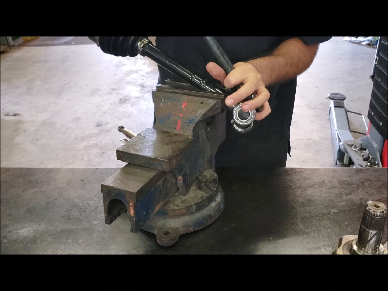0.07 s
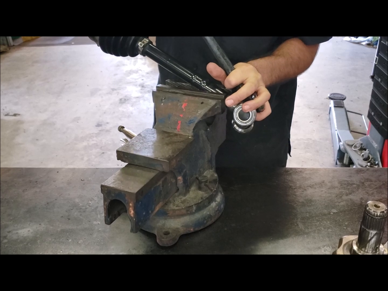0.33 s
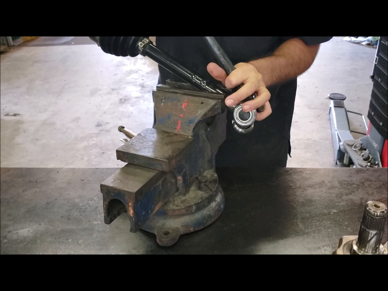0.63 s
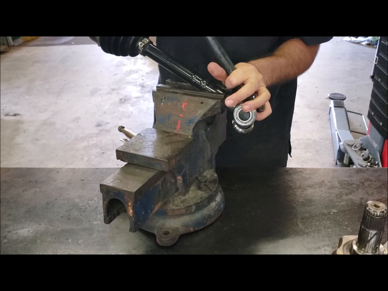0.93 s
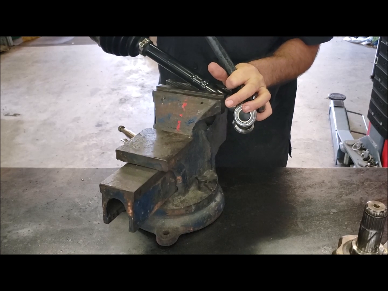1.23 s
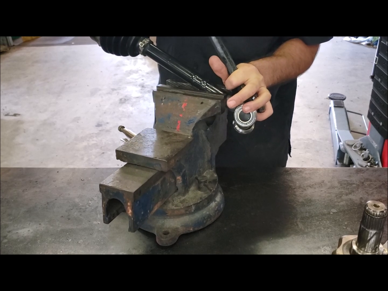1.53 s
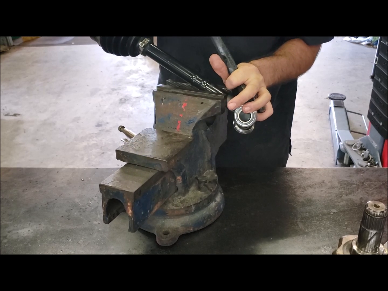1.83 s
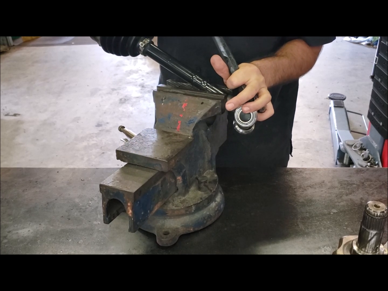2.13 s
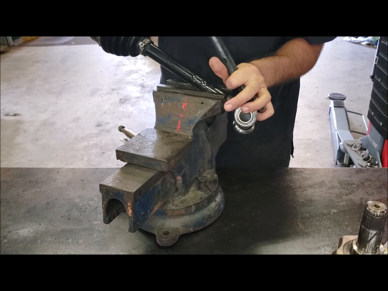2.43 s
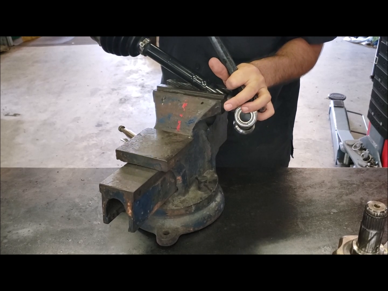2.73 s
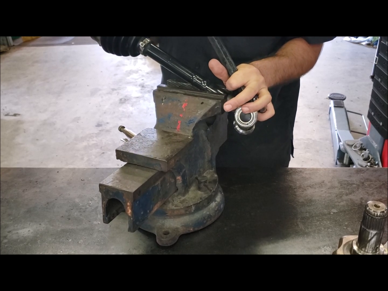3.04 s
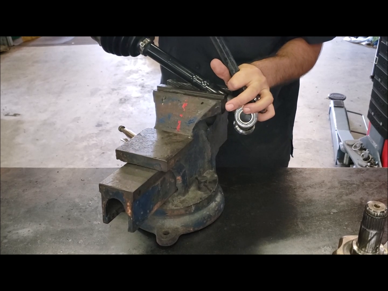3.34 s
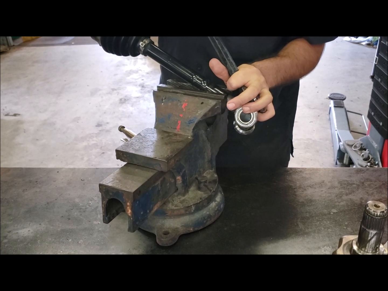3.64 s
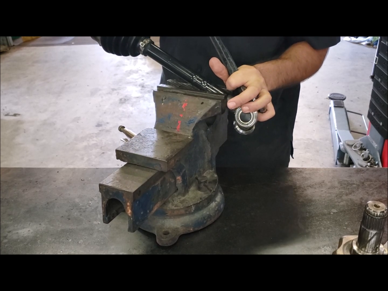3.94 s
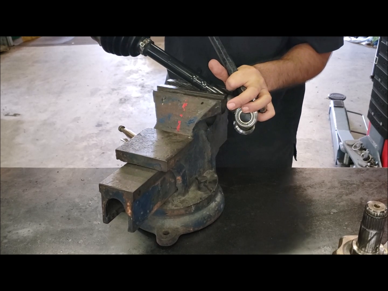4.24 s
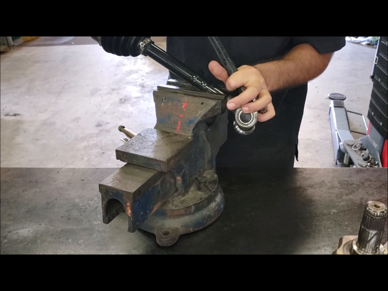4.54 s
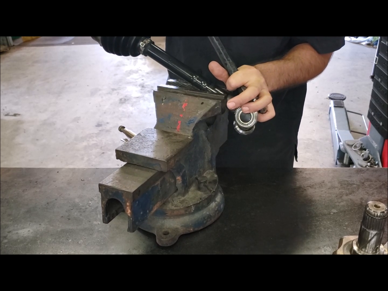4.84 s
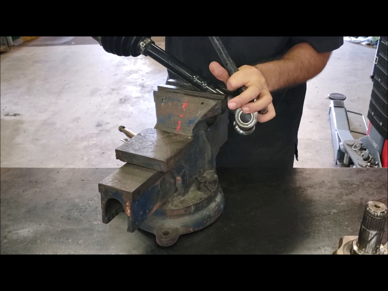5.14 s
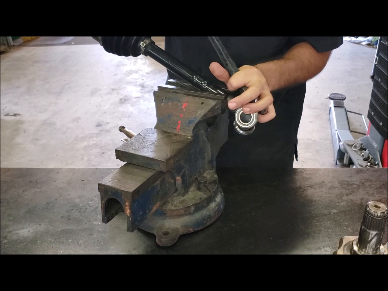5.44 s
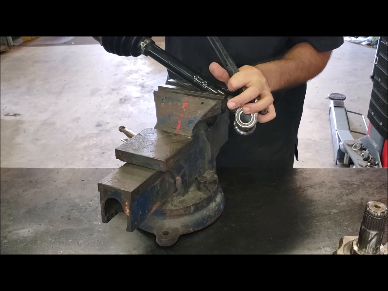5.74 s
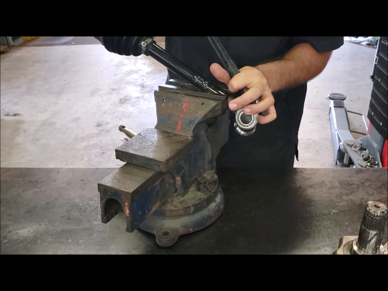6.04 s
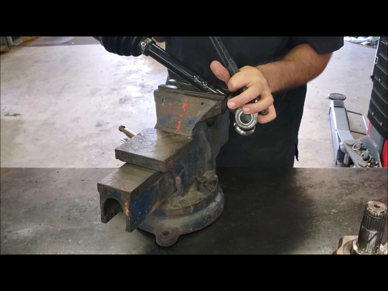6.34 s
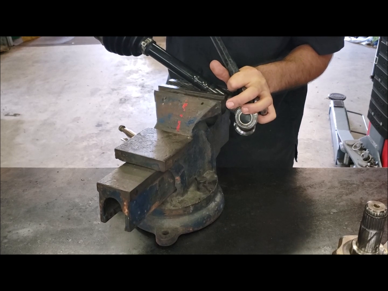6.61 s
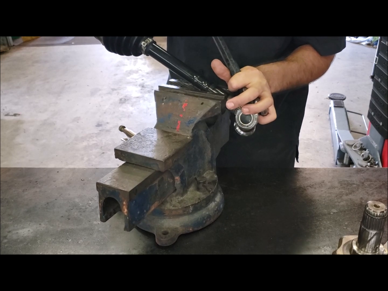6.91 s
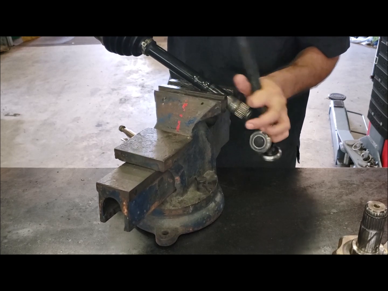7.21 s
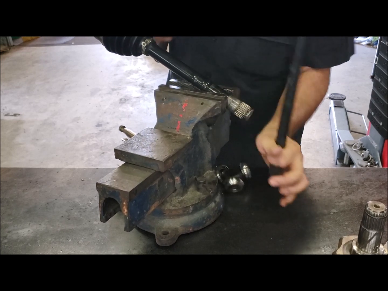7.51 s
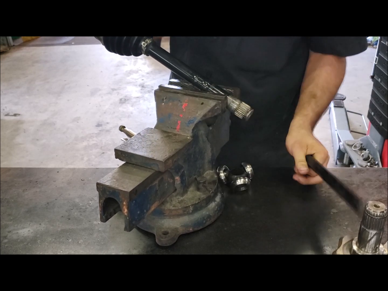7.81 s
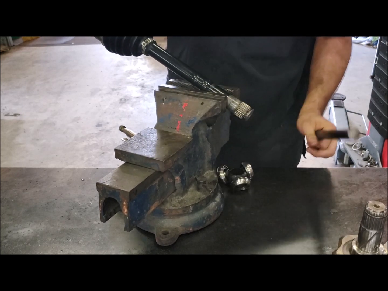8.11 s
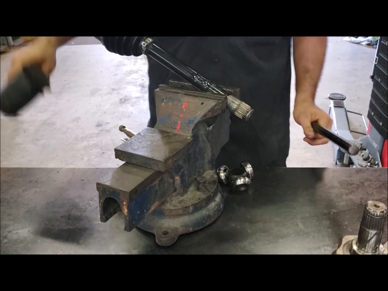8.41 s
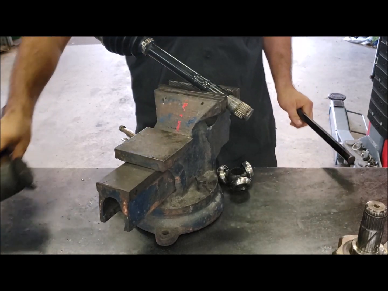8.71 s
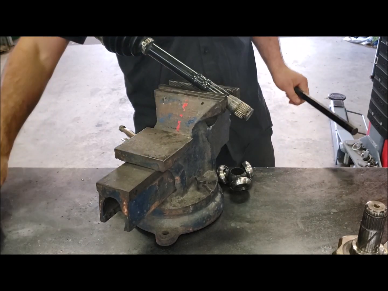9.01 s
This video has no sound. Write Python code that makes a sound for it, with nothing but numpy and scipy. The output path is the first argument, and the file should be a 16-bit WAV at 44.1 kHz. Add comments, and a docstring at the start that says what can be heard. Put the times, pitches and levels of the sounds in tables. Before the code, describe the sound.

In a workshop, a hammer taps a steel chisel against a joint on a shaft held in a vise, about three sharp, ringing clacks a second. The tapping pauses twice for faint knocks as the chisel is reseated. After a longer run, the joint slips off and rattles to rest on the steel bench, and the hammer lands with a clatter and thud. The sound is close, with short room echoes over a faint hush.

```python
"""In a workshop, a hammer taps a steel chisel set against a joint on a shaft clamped in a bench vise.
Each tap clacks through the vise, rings chisel and shaft and shakes the steel bench; twice the chisel
is nudged into a new seat. The joint slips off, drops and rattles to rest on the bench top; then the
hammer is put down. Clacks are noise bursts, most through steel resonances; rings are decaying modes.
Short room echoes and a faint hush, rumble and hiss lie underneath."""
import sys
import numpy as np
from scipy import signal
from scipy.fft import rfft, irfft, next_fast_len
from scipy.io import wavfile

SR = 44100
rng = np.random.default_rng(int(sys.argv[2]) if len(sys.argv) > 2 else 0)


def wav_record(signal):
    """Record a signal, one row per channel, as 16-bit PCM in the file named by sys.argv[1]."""
    frames = np.transpose(np.atleast_2d(signal))
    bounded = np.clip(frames, -1, 1)
    # unit amplitude maps onto the largest positive 16-bit level
    quanta = np.round(bounded * 32767).astype(np.int16)
    wavfile.write(sys.argv[1], SR, quanta)


N = 399546
RING_SAMPLES = 65536
TIME_S, AGE_S = np.arange(N) / SR, np.arange(RING_SAMPLES) / SR
GIVE_S = 7.05  # the joint starts to give way

# Blows on the chisel. Each row: start in seconds, level in dB, rattle in dB (chatter of the parts),
# ping in dB (how freely the chisel rings), knock in dB (how squarely the blow enters the vise).
CHISEL_TAPS = [ (0.0123, -21.5, 3, -7.5, 0), (0.2901, -19.5, 1.5, -3, 0), (.583, -16, -1.5, -2, -1),
               (0.8681, -15, -4, 3.5, -4.5), (1.1421, -18.5, 2, 10, -2), (1.424, -16, -3, 2, -1.5),
               (2.549, -18.5, -2.5, -5.5, -3), (2.869, -18, -2.5, -1, -1), (3.179, -18, -2, 15.5, 3),
               (4.5065, -20.5, -2.5, -4, 3.5), (4.8447, -17.5, 0, 7.5, 1.5), (5.1732, -17, -5, -19.5, 0),
               (5.463, -18.5, 1.5, 5, -1.5), (5.764, -15, -0.5, 9.5, -2), (6.0993, -18, 1, 9.5, 0.5),
               (6.464, -16, 1, 5.5, -1.5), (6.836, -17, -1.5, -8.5, -0.5), (7.175, -18.5, -1, 11, 1)]
# Resonances of chisel, shaft and vise. Each row: frequency in Hz, width in Hz, lift in dB.
VISE_RESONANCES = [(405, 45, 13), (470, 45, 11), (728, 50, 13), (805, 35, 10), (947, 35, 6),
                   (1073, 45, 17.5), (1270, 40, 6), (1660, 50, 6), (1840, 45, 10), (2030, 50, 6),
                   (2340, 55, 6), (2700, 65, 5), (3000, 70, 6), (3300, 120, 6), (5110, 70, 11),
                   (5950, 180, 7), (7800, 100, 9), (8170, 90, 7), (10980, 110, 11), (11800, 70, 6),
                   (14610, 80, 10)]
# Bench frame. Each row: frequency in Hz, level in dB, t60 in seconds.
FRAME_MODES = [(65.7, -1, 0.57), (72.6, -4.5, 0.91), (91, -8.5, 0.73), (106.3, 0, 0.46),
               (138.5, -13.5, 1.3), (170.7, -5, 0.74), (199.4, -2.5, 0.83), (215.7, -7.5, 0.95),
               (243, -7.5, 0.75)]
# Bench top plate. Each row: frequency in Hz, level in dB, t60 in seconds.
PLATE_MODES = [(248, -33, 1.5), (295, -14, .05), (350, -9, .05), (405, 1, .1), (440, 0, .08), (474, 0, .08),
               (530, -8, .06)]
# Clatter of a landing on the bench. Each row: frequency in Hz, spectral density in dB.
CLATTER_SPECTRUM = [(100, -35), (300, -9.5), (700, -3.5), (1400, 2.5), (2500, 3), (4500, 2), (6500, -2),
                    (8500, -11), (11500, -9.5), (16000, -20.5)]
# Stereo likeness. Each row: frequency in Hz, left-right correlation.
STEREO_LIKENESS = [(60, 0.99), (290, 0.9), (640, 0.84), (1400, 0), (3000, 0.015), (16000, 0)]


def from_db(db):
    """Decibels to gain."""
    return 10 ** (np.asarray(db) / 20)


def rms_one(x):
    """Scale to rms 1."""
    return x / np.sqrt(np.mean(x ** 2) + 1e-20)


def at_hz(points, hz):
    """Read a table on a log-frequency axis."""
    return np.interp(np.log(hz), np.log(np.array(points)[:, 0]), np.array(points)[:, 1])


def bins_hz(size):
    """FFT bin frequencies, floored at 1 Hz."""
    return np.maximum(np.fft.rfftfreq(size, 1 / SR), 1)


def tint(x, gain_db):
    """Apply a gain per frequency bin."""
    return irfft(rfft(x) * from_db(gain_db), x.shape[-1])


def stereo_noise(size):
    """White noise, alike on both sides in the bass only."""
    alike = np.clip(at_hz(STEREO_LIKENESS, bins_hz(size)), -.99, .99)
    mid, side = rfft(rng.standard_normal((2, size)))
    return irfft(np.sqrt(1 + alike) * mid + np.sqrt(1 - alike) * side * [[1], [-1]], size)


def add(track, start_s, sound):
    """Mix a sound in from start_s."""
    start = int(np.clip(start_s * SR, 0, N - 1))
    track[:, start:start + sound.shape[1]] += sound[:, :N - start]


def swell(centre_s, half_s):
    """Gaussian rise and fall of height 1."""
    return np.exp(-((TIME_S - centre_s) / half_s) ** 2)


def ring(modes, rise_s):
    """Decaying modes of one blow, each struck with random strength; starts near rms 1."""
    out = np.zeros((2, RING_SAMPLES))
    for hz, db, t60_s in modes:
        spread_rad = np.arccos(np.clip(at_hz(STEREO_LIKENESS, hz), -1, 1))
        phase = rng.uniform(0, 2 * np.pi) + spread_rad * rng.normal(0, 0.29, (2, 1))
        decay = from_db(db + 2 * rng.normal() - 60 * AGE_S / t60_s)
        out += decay * np.sin(2 * np.pi * hz * AGE_S + phase)
    power = sum(from_db(row[1]) ** 2 for row in modes) / 2
    return out * (1 - np.exp(-AGE_S / rise_s)) / np.sqrt(power)


def shimmer(modes, t60_s, size):
    """Steel touching steel: each mode splits into a cluster that beats as it dies; starts near rms 1."""
    hz = bins_hz(size)
    clusters = sum(from_db(db + 3 * rng.normal()) / (1 + (2 * (hz - centre_hz) / width_hz) ** 2)
                   for centre_hz, width_hz, db in modes)
    partials = clusters * np.exp(2j * np.pi * rng.random((2, len(hz))))
    return rms_one(irfft(partials, size)) * from_db(-60 * AGE_S[:size] / t60_s)


def chatter(rise_s, t60_s, size):
    """Contact chatter: a noise burst that drives all frequencies, some a little harder than others."""
    age_s = AGE_S[:size]
    envelope = (1 - np.exp(-(age_s / rise_s) ** 2)) * from_db(-60 * age_s / t60_s)
    spectrum = rfft(stereo_noise(size) * envelope)
    flattened = irfft(spectrum / np.sqrt(np.abs(spectrum) + 1e-9), size)
    return flattened * np.minimum(1, 4 * envelope)


def clack(spectrum, resonances, colour_db, rise_s, t60_s, window_s, size=8192):
    """Chatter, coloured by the contact, feeds the steel's resonances; rms 1 over the first window_s."""
    hz = bins_hz(size)
    body_db, knock_db, bite_db, treble_db = colour_db
    contact = [(550, body_db), (1100, knock_db), (1800, 0), (3200, bite_db), (7000, treble_db)]
    drive = tint(chatter(rise_s, t60_s, size), at_hz(spectrum, hz) + at_hz(contact, hz))
    drive *= (1 - np.exp(-2 * AGE_S[:size] / rise_s)) * (np.arange(size) < size / 2)
    out = drive.copy()
    for centre_hz, width_hz, lift_db in resonances:
        radius = np.exp(-np.pi * width_hz / SR)
        zeros = np.array([1, 0, -1]) * (1 - radius ** 2) / 2
        poles = [1, -2 * radius * np.cos(2 * np.pi * centre_hz / SR), radius ** 2]
        struck_db = lift_db + 2.5 * rng.normal()  # no two blows land on the same spot
        out += (from_db(struck_db) - 1) * signal.lfilter(zeros, poles, drive)
    return out / np.sqrt(np.mean(out[:, :int(window_s * SR)] ** 2))


def background():
    """Steady shop hush; rumble and hiss that sink after each tap; soft low bumps in the final lull."""
    # Three noise beds. Each row: frequency in Hz, spectral density in dB.
    hush_spectrum = [(25, -12.5), (65, -6), (95, -8.5), (150, -6.5), (260, -6), (500, -16.5), (800, -20.5),
                     (1100, -18), (1600, -39), (3000, -38), (6200, -35), (7200, -7), (8000, -27.5),
                     (9000, -44.5), (16000, -53)]
    rumble_spectrum = [(30, -22), (60, -0.5), (88, 3.5), (125, -10.5), (200, -16.5), (300, -17), (450, -24),
                       (1000, -23.5), (4000, -58)]
    hiss_spectrum = [(1000, -13), (2400, -6), (3700, 5), (4500, -1), (5500, -1.5), (7300, 2), (8600, -13),
                     (12000, -16), (16000, -38.5)]
    size = next_fast_len(N)
    hush, rumble, hiss = (rms_one(tint(stereo_noise(size), at_hz(spectrum, bins_hz(size))))[:, :N]
                          for spectrum in (hush_spectrum, rumble_spectrum, hiss_spectrum))
    starts_s = np.sort([0] + [row[0] for row in CHISEL_TAPS])
    since_tap_s = TIME_S - starts_s[np.searchsorted(starts_s, TIME_S, side="right") - 1]
    rumble_db = -49.5 - 3 * since_tap_s - 21 * np.maximum(TIME_S - GIVE_S, 0)
    hiss_db = -53.5 - 5.5 * since_tap_s - 26 * swell(centre_s=8.62, half_s=0.2)
    bumps = sum(from_db(db) * swell(centre_s, half_s=0.055)
                for centre_s, db in [(7.98, -64), (8.45, -59), (8.85, -62), (8.98, -61.5)])
    return from_db(-63) * hush + (from_db(rumble_db) + bumps) * rumble + from_db(hiss_db) * hiss


def workshop_echoes(sound, build_s):
    """Diffuse echoes build up, then die band by band, the high treble first."""
    # Room decay. Each row: frequency in Hz, t60 in seconds.
    room_decay = [(100, 0.73), (400, 0.62), (1000, 0.59), (2800, 0.75), (6000, 0.61), (10000, 0.54),
                  (16000, 0.2)]
    # Echo colour. Each row: frequency in Hz, level in dB.
    room_colour = [(100, 9.5), (400, 4.5), (1000, -2), (2000, -0.5), (5000, -1), (10000, -0.5),
                   (16000, 4.5)]
    hz = bins_hz(RING_SAMPLES)
    noise_spectrum = rfft(rms_one(stereo_noise(RING_SAMPLES)))
    log_centres = np.log([row[0] for row in room_decay])
    tail = 0
    for share, (_, t60_s) in zip(np.eye(len(room_decay)), room_decay):
        band = np.interp(np.log(hz), log_centres, share) * from_db(at_hz(room_colour, hz))
        tail = tail + irfft(noise_spectrum * band) * from_db(-60 * AGE_S / t60_s)
    build_up = 1 - np.exp(-(AGE_S / build_s) ** 2)
    response = rms_one(tail * build_up) / np.sqrt(RING_SAMPLES)
    return signal.fftconvolve(sound, response, axes=1)[:, :N]


def chisel_nudges():
    """Light contacts knock dully on the vise, clink the loose chisel and stir the bench frame."""
    # Reseating contacts. Each row: start in seconds, knock level in dB, clink in dB over the knock.
    nudges = [(1.729, -37, 5), (1.835, -42, -26), (2.1188, -36, -8), (3.717, -30, -3.5), (3.844, -47, -10),
              (3.9081, -28.5, -26)]
    # Dull knock. Each row: frequency in Hz, spectral density in dB.
    knock_spectrum = [(100, -24.5), (240, 4.5), (310, -21), (400, 1.5), (600, 1.5), (1100, 3), (2000, 9.5),
                      (2800, -10), (6000, -28), (9000, -20), (16000, -39)]
    # Loose chisel. Each row: frequency in Hz, width in Hz, level in dB.
    clink_modes = [(2824, 230, -2.5), (4970, 72, -10), (5460, 380, -8.5), (7800, 160, -3.5),
                   (11350, 150, -12)]
    out = np.zeros((2, N))
    for start_s, db, clink_db in nudges:
        colour_db = (5 - 0.4 * clink_db, 0, 0, 0)  # less clink, more body
        knock = clack(knock_spectrum, VISE_RESONANCES[:6], colour_db,
                      rise_s=0.00063, t60_s=0.053, window_s=0.012)
        add(out, start_s, from_db(db) * knock)
        add(out, start_s, from_db(db + clink_db) * shimmer(clink_modes, t60_s=0.064, size=8192))
        add(out, start_s, from_db(db - 21) * ring(FRAME_MODES, rise_s=0.0097))
    return out


def hammer_down():
    """Handle and head land on the bench in turn, each with a clatter, a plate ring and a thud."""
    # Landings. Each row: start in seconds, clatter in dB, plate ring in dB, thud in dB.
    landings = [(9.036, -16, -19, -21.5), (9.051, -22.5, -20, -20)]
    # Thud under the hammer. Each row: frequency in Hz, level in dB, t60 in seconds.
    thud_modes = [(105.2, -2.5, .4), (153, 0.5, 0.18), (201, 5.5, 0.7), (255, 2, 0.32)]
    out = np.zeros((2, N))
    for start_s, clatter_db, plate_db, thud_db in landings:
        clatter = clack(CLATTER_SPECTRUM, [], colour_db=(8, 3, -2.5, 3.5),
                        rise_s=0.0014, t60_s=0.58, window_s=0.0185)
        add(out, start_s, from_db(clatter_db) * clatter)
        add(out, start_s, from_db(plate_db) * ring(PLATE_MODES, rise_s=0.0012))
        add(out, start_s, from_db(thud_db) * ring(thud_modes, rise_s=0.0024))
    return out


def falling_joint():
    """The joint clinks off the shaft and rattles to rest; flat landings ring and thump the bench top."""
    # Bounces. Each row: start in seconds, level in dB, weight in dB (high if flat, low if glancing).
    bounces = [(7.422, -25, 4.5), (7.457, -21, -5), (7.5108, -10.5, 12), (7.5207, -19, 11.5),
               (7.5313, -11, 9), (7.57, -10.5, -12.5), (7.576, -16, -7), (7.598, -16, -9),
               (7.638, -18, -2.5)]
    # Resonances of the joint. Each row: frequency in Hz, width in Hz, lift in dB.
    joint_resonances = [(735, 56, 7), (960, 30, 10.5), (2100, 32, 1.5), (2224, 40, 0), (2620, 23, 5),
                        (3740, 47, 7.5), (3720, 23, -3.5), (4170, 17, 6.5), (5840, 50, -4.5),
                        (6730, 47, 1.5), (11600, 60, 11)]
    # Lingering ring of the freed steel. Each row: frequency in Hz, width in Hz, level in dB.
    steel_modes = [(2850, 430, -13), (3750, 130, 2), (4140, 110, -7.5), (4770, 8.7, 7.5)]
    # Bench thump. Each row: frequency in Hz, spectral density in dB.
    thump_spectrum = [(60, -25), (120, -13.5), (190, 0), (260, 2), (340, -6.5), (700, -28.5),
                      (2000, -57)]
    out = np.zeros((2, N))
    for start_s, db, weight_db in bounces:
        clatter = clack(CLATTER_SPECTRUM, joint_resonances, colour_db=(weight_db, 0.5, 0, 3),
                        rise_s=0.0004, t60_s=0.077, window_s=0.0036)
        add(out, start_s, from_db(db) * clatter)
        plate_db = db - 17 + weight_db
        add(out, start_s, from_db(plate_db) * ring(PLATE_MODES, rise_s=0.0016))
        thump = clack(thump_spectrum, [], (0, 0, 0, 0), rise_s=0.0059, t60_s=0.16, window_s=0.023)
        add(out, start_s, from_db(plate_db - 15.5) * thump)
        add(out, start_s, from_db(db - 35) * shimmer(steel_modes, t60_s=1.42, size=RING_SAMPLES))
    return out


def steel_blow(db, colour_db, rattle_db):
    """A clack that lengthens with rattle, plus the hard faces' brief crack; returns direct, room send."""
    # Clack of chisel, shaft and vise. Each row: frequency in Hz, spectral density in dB.
    clack_spectrum = [(100, -14.5), (300, -19), (600, -10.5), (900, -3), (1300, -4), (2000, -2), (3100, -3),
                      (4200, -2.5), (6000, -6.5), (8000, -4), (9500, -10), (11500, -4.5), (13500, -10),
                      (16000, -10.5)]
    # Hammer face on chisel head. Each row: frequency in Hz, spectral density in dB.
    crack_spectrum = [(300, -30.5), (1500, 10), (3200, 13), (4200, -12), (5600, 8.5), (8000, 2),
                      (16000, -11.5)]
    chatter_t60_s = 0.065 * np.exp(0.046 * rattle_db)
    hit = clack(clack_spectrum, VISE_RESONANCES, colour_db,
                rise_s=0.0012, t60_s=chatter_t60_s, window_s=0.015)
    crack = clack(crack_spectrum, [], colour_db, rise_s=0.0013, t60_s=0.017, window_s=0.0036)
    return from_db(db) * hit + from_db(db + 3) * crack, from_db(db + rattle_db) * hit


def tap_colour_db(ping_db, knock_db):
    """A square blow trades body and bite for knock; a freely held chisel adds bite and treble."""
    body_db = 5 - 0.51 * knock_db
    bite_db = -4.5 + 0.16 * ping_db - 0.75 * knock_db
    treble_db = -1.5 + 0.26 * ping_db
    return body_db, knock_db - 1.94, bite_db, treble_db


def chisel_taps():
    """Taps clack and ring chisel, shaft and bench until the chisel slips; returns direct, room send."""
    # Rings of the chisel and the clamped shaft. Each row: frequency in Hz, width in Hz, level in dB.
    chisel_modes = [(5100, 110, -4), (7775, 70, -2), (8165, 70, -9), (10970, 45, 1), (11800, 50, -10),
                    (14600, 65, -8)]
    shaft_modes = [(725, 14, 2), (805, 14, -4), (1840, 30, 0), (2680, 45, -7), (5070, 70, -6)]
    loosening_db_per_s = 1.1  # the shaft rings more as the joint works loose
    give_db = 9  # the bench takes less of the blow once the joint gives
    mean_db = np.mean([row[1] for row in CHISEL_TAPS])
    direct, to_room = np.zeros((2, 2, N))
    for start_s, db, rattle_db, ping_db, knock_db in CHISEL_TAPS:
        hit, rattle = steel_blow(db, tap_colour_db(ping_db, knock_db), rattle_db)
        add(direct, start_s, hit)
        add(to_room, start_s, rattle)
        chisel_db = db - 20.5 + ping_db
        add(direct, start_s, from_db(chisel_db) * shimmer(chisel_modes, t60_s=0.53, size=32768))
        shaft_db = db - 17.5 + 0.8 * rattle_db - 0.7 * knock_db + loosening_db_per_s * start_s
        add(direct, start_s, from_db(shaft_db) * shimmer(shaft_modes, t60_s=0.35, size=32768))
        boom_db = -30.5 + 0.58 * (db - mean_db) - give_db * (start_s > GIVE_S)
        add(direct, start_s, from_db(boom_db) * ring(FRAME_MODES, rise_s=0.01))
    # The chisel slips through with the joint: two dry, biting clacks.
    for start_s, db in [(7.3729, -24), (7.38, -21.5)]:
        hit, rattle = steel_blow(db, colour_db=(1.5, -18, 2, -12), rattle_db=-7.5)
        add(direct, start_s, hit)
        add(to_room, start_s, rattle)
    return direct, to_room


def scene():
    """All blows share the room; the left side is louder except in the top treble."""
    # Stereo balance. Each row: frequency in Hz, left over right in dB.
    balance = [(60, 3.5), (500, 2.5), (2200, 5), (4500, 4), (8000, 5.5), (16000, -4)]
    taps, taps_to_room = chisel_taps()
    nudges = chisel_nudges()
    landings = falling_joint() + hammer_down()
    to_room = from_db(-1.5) * taps_to_room + from_db(-7) * nudges + from_db(-5) * landings
    mix = taps + nudges + landings + workshop_echoes(to_room, build_s=0.0036) + background()
    size = next_fast_len(N + RING_SAMPLES)
    padded = np.pad(mix, ((0, 0), (0, size - N)))
    return tint(padded, at_hz(balance, bins_hz(size)) * [[.5], [-.5]])[:, :N]


def record(dry):
    """Thin the deep bass, round the peaks, cut the top."""
    bass_cut_hz, top_cut_hz = 36, 15900
    thinned = signal.sosfilt(signal.butter(2, bass_cut_hz, "high", fs=SR, output="sos"), dry)
    return signal.sosfilt(signal.cheby1(12, .3, top_cut_hz, fs=SR, output="sos"), np.tanh(thinned))


dry = scene()
out = record(dry)
wav_record(out)
```